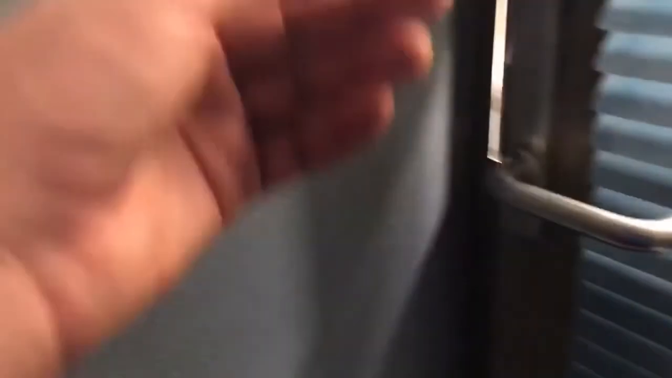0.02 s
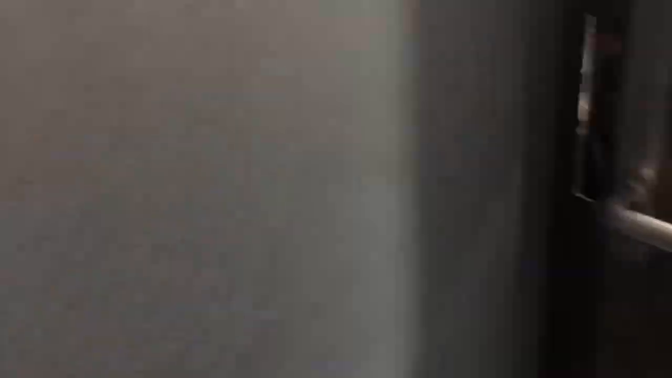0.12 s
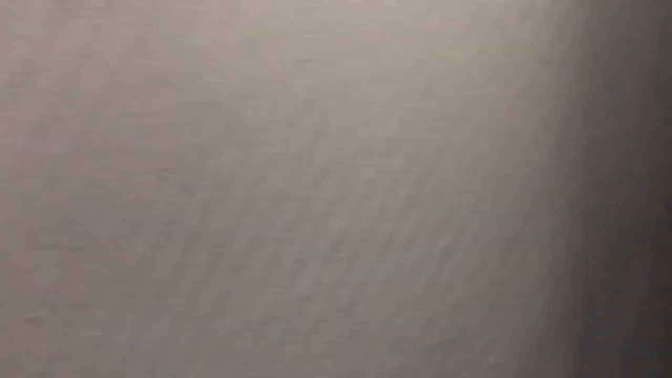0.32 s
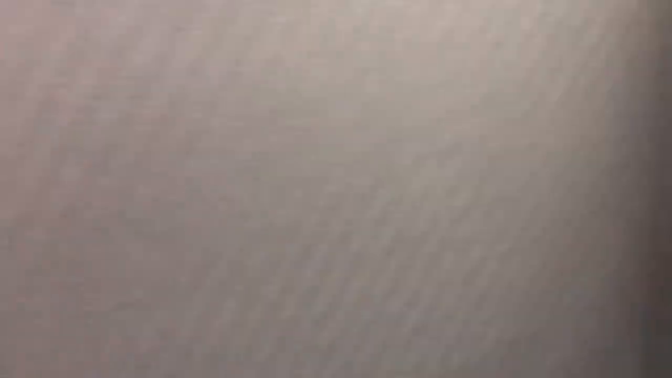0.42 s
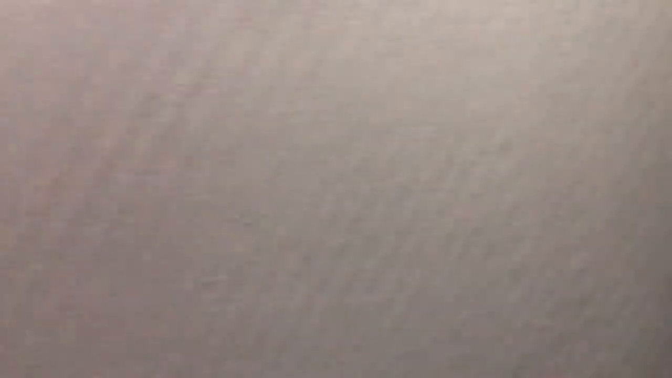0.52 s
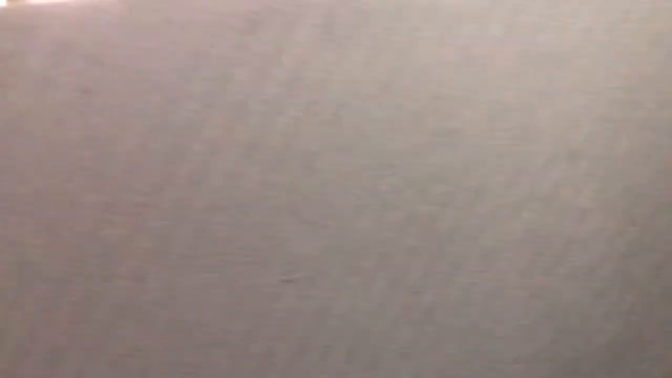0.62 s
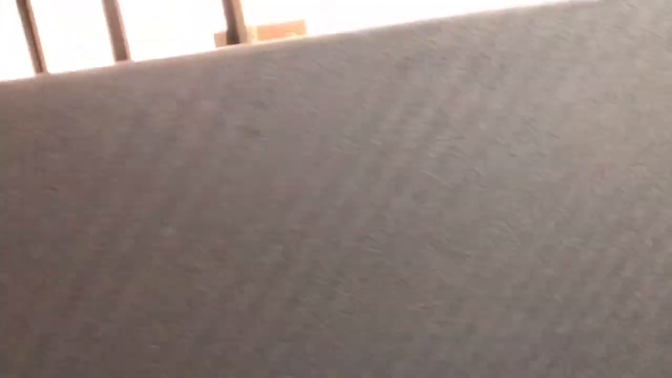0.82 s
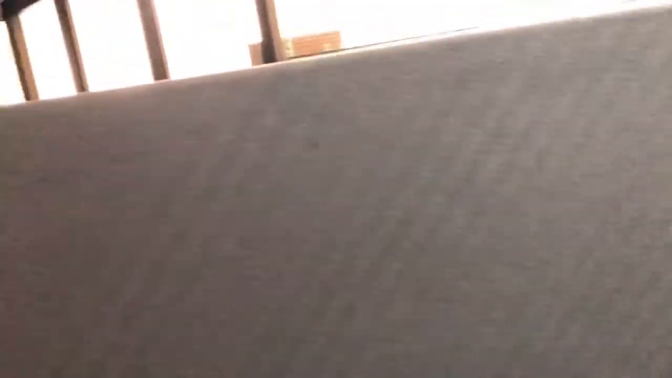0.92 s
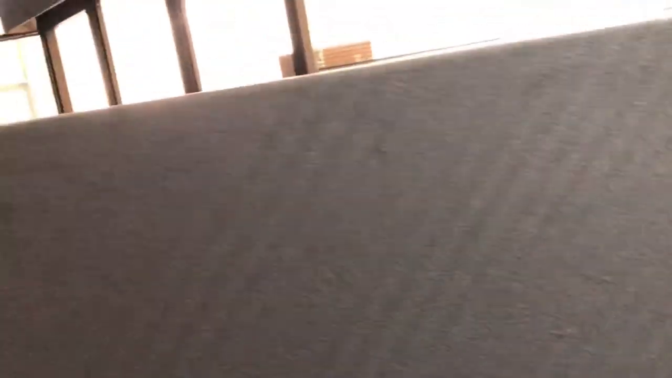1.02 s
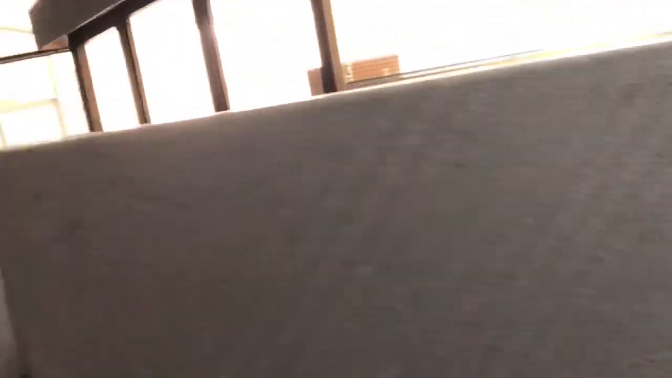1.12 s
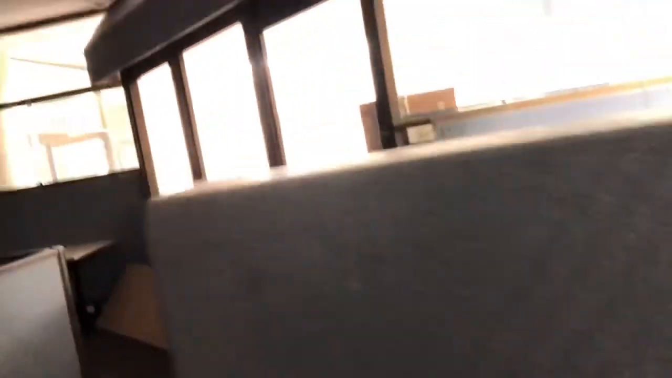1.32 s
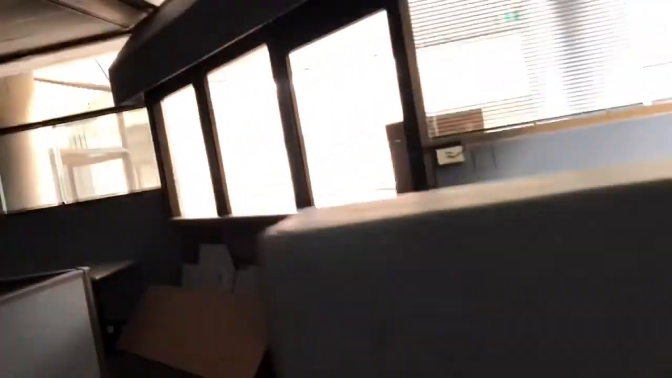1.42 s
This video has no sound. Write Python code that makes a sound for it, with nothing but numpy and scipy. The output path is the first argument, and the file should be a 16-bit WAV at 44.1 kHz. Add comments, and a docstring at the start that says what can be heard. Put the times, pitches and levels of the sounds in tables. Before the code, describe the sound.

Close up, a door handle's latch clicks, bangs loudly with a hollow panel knock, clacks again with a gritty scrape, then clicks softly with a tiny spring ring; faint rustle and late tick over quiet room rumble.

```python
"""In an empty office, close to a small microphone, a metal lever handle is worked on a panel door.
The latch clicks and chatters: short noise bursts plus ringing lever tones, with a high ping at the first clicks.
The door knocks and booms, then scuffs faintly: dull noise plus fading tones. After a faint high hiss the spindle
scrapes (gritty hiss), a spring sings briefly (short wavering tones), and a faint rustle follows.
The room rings on over low rumble, room noise, a faint hum and microphone hiss."""
import sys
import numpy as np
from scipy import signal
from scipy.fft import rfft, irfft, next_fast_len
from scipy.io import wavfile
from scipy.ndimage import map_coordinates

SR = 44100
rng = np.random.default_rng(int(sys.argv[2]) if len(sys.argv) > 2 else 0)


def store_pcm(level_fs):
    """Save levels as 16-bit WAV."""
    pcm = np.round(np.clip(level_fs, -1, 1) * 32767).astype(np.int16)
    wavfile.write(sys.argv[1], SR, np.atleast_2d(pcm).T)


N = 66150
T = np.arange(N) / SR  # time of every sample, in seconds


def amp(db):
    """Turn decibels into a multiplier."""
    return 10 ** (np.asarray(db) / 20)


def unit(x):
    """Scale a sound to an average (rms) strength of 1."""
    return x / np.sqrt(np.mean(x ** 2) + 1e-20)


def level(rows):
    """Loudness curve through (start_s, level_db) points, practically silent outside them."""
    return amp(np.interp(T, *np.transpose(rows), left=-150, right=-150))


def along(points, hz):
    """Read a curve of (pitch_hz, value) points, with pitch spaced as the ear hears it (log axis)."""
    point_hz, values = np.transpose(points)
    return np.interp(np.log(hz + 1), np.log(point_hz + 1), values)


def filtered(x, response):
    """Multiply every frequency in x by response(hz)."""
    size = next_fast_len(N + SR // 2)  # spare room so that the end does not wrap onto the start
    spectrum = rfft(x, size) * response(np.fft.rfftfreq(size, 1 / SR))
    return irfft(spectrum, size)[..., :N]


def noise(spectrum):
    """Random noise coloured by (pitch_hz, level_db) points, scaled to rms 1."""
    return unit(filtered(rng.standard_normal(N), lambda hz: amp(along(spectrum, hz))))


def wobble(rate):
    """A smooth random curve with rate random points a second."""
    points = rng.standard_normal(int(N * rate / SR) + 4)
    return map_coordinates(points, [T * rate])


def tone(phase):
    """A sine of rms 1."""
    return np.sqrt(2) * np.sin(phase)


def burst(start, rise, t60):
    """Loudness that rises from start, then fades by 60 dB every t60 seconds."""
    t = np.maximum(T - start, 0)
    return (1 - np.exp(-t / max(rise, 1e-4))) * amp(-60 * t / max(t60, 1e-3))


DETUNE = 0.015  # typical random pitch shift, as a fraction


def ring(modes, start, spread_db, rise):
    """Fading tones, each shifted slightly in pitch at random, and in level too when spread_db is above 0."""
    out = np.zeros(N)
    for hz, db, t60 in modes:
        gain = amp(db + spread_db * rng.standard_normal())
        shifted_hz = hz * (1 + DETUNE * rng.standard_normal())
        out += gain * burst(start, rise, t60) * np.sin(2 * np.pi * shifted_hz * (T - start))
    return out


# Loudness of the low rumble, before a small trim: start_s, level_db
RUMBLE_LEVEL = [(0.0, -45), (0.074, -43), (0.192, -49), (0.216, -31), (0.324, -31), (0.43, -42),
                (0.538, -32), (0.572, -54), (0.66, -42.5), (0.768, -51), (0.788, -49), (0.968, -57.5),
                (1.274, -60), (1.302, -65), (1.34, -61.5), (1.5, -58)]
# Tone colour of the rumble: pitch_hz, level_db (relative, per Hz)
RUMBLE_COLOUR = [(13, -39), (22, -13), (42, 1.5), (59, 6), (113, -5.5), (162, -3.5), (260, -23), (340, -47),
                 (570, -120)]


def rumble():
    """Door and floor rumble: deep noise that swells and sinks."""
    return level(RUMBLE_LEVEL) * amp(-1.5) * noise(RUMBLE_COLOUR)


# Loudness of the room noise, before its waver: start_s, level_db
AIR_LEVEL = [(0, -53), (.07, -53.5), (.11, -49.5), (.19, -48), (.35, -56), (.5, -49.5), (.7, -58),
             (.84, -61.5), (.95, -64), (1.1, -65), (1.5, -63)]
# Tone colour of the room noise: pitch_hz, level_db (relative, per Hz)
AIR_COLOUR = [(59, -37.5), (100, -12), (255, -13), (274, -15.5), (348, -14), (560, -14), (886, -22.5),
              (2220, -25.5), (2870, -27.5), (8000, -35.5), (10400, -67), (17600, -120)]
AIR_WAVER_DB = 1.2


def room_noise():
    """Soft coloured noise whose loudness wavers a little."""
    waver = amp(AIR_WAVER_DB * wobble(12.37))
    return level(AIR_LEVEL) * waver * noise(AIR_COLOUR)


# Steady tones of the mains hum, before their waver: pitch_hz, level_db (rms)
HUM_TONES = [(150, -69), (200, -87.5), (250, -70.5), (450, -76)]


def hum():
    """Mains hum: a few low sine tones, each slowly wavering in loudness."""
    out = np.zeros(N)
    for hz, db in HUM_TONES:
        gain = amp(db + 1.52 * wobble(2.7))
        out += gain * tone(2 * np.pi * (hz * T + rng.random()))
    return out


# Tone colour of the microphone's own hiss: pitch_hz, level_db (relative, per Hz)
HISS_COLOUR = [(2350, -26), (4000, -0.5), (7230, -6), (10700, -3.5), (16000, -11.5)]


def microphone_hiss():
    """Steady faint noise made by the microphone."""
    return amp(-74) * noise(HISS_COLOUR)


def background():
    """Everything that lies under the handle: rumble, room noise, hum and hiss add up."""
    return rumble() + room_noise() + hum() + microphone_hiss()


# How long the room's echo takes to fall by 60 dB: pitch_hz, fade_s
ROOM_FADE = [(100, 1.2), (500, 0.95), (2000, 0.89), (6000, 0.53), (14000, 0.18)]
ROOM_DB, EARLY_DB = -13.5, -15  # strength of the long tail and of the quick answer
EARLY_T60 = 0.13  # seconds for the quick answer to fall by 60 dB


def room(x):
    """Near walls answer with quickly fading noise; a longer tail fades at its own speed at each pitch."""
    hz, t, grid = signal.stft(rng.standard_normal(SR), SR, nperseg=256)
    fade = amp(-60 * t / along(ROOM_FADE, hz)[:, None])
    tail = signal.istft(grid * fade, SR, nperseg=256)[1]
    early_fade = amp(-60 * np.arange(len(tail)) / SR / EARLY_T60)
    early = rng.standard_normal(len(tail)) * early_fade
    answer = amp(ROOM_DB) * tail / np.linalg.norm(tail) + amp(EARLY_DB) * early / np.linalg.norm(early)
    delayed = np.pad(answer, (200, 0))  # the answer comes 200 samples later, about 4.5 ms
    return signal.fftconvolve(x, delayed)[:N]


def gritty(spectrum):
    """Gritty noise: coloured noise roughened by fast random loudness changes, scaled to rms 1."""
    grit_db = 3.5
    return unit(noise(spectrum) * amp(grit_db * wobble(300)))


# Loudness of the faint rustle: start_s, level_db
RUSTLE_LEVEL = [(1.02, -74.5), (1.12, -68), (1.24, -71.5), (1.27, -67), (1.295, -67.5), (1.33, -69),
                (1.37, -61.5), (1.42, -70), (1.5, -68.5)]
# Tone colour of the rustle: pitch_hz, level_db (relative, per Hz)
RUSTLE_COLOUR = [(300, -33), (600, 0), (1300, 2.5), (2500, -9), (4000, -2.5), (6500, -12), (10000, -15)]


def rustle():
    """A faint gritty noise late in the scene."""
    return level(RUSTLE_LEVEL) * gritty(RUSTLE_COLOUR)


# Short ringing tones: a high ping with the first clicks, then spring notes; level before the waver:
# start_s, length_s, pitch_hz, level_db
SHORT_TONES = [(.085, .012, 12200, -44), (.165, .025, 3450, -62), (.34, .025, 4270, -47),
               (.522, .045, 1510, -52), (.57, .05, 3880, -67), (.63, .016, 1525, -59),
               (.642, .009, 4000, -55), (.643, .016, 6050, -62), (.648, .055, 3540, -59),
               (.662, .022, 1535, -54), (.686, .014, 1530, -62), (.72, .13, 1520, -71),
               (1.358, .014, 3900, -68), (1.38, .03, 3900, -72)]
SING_WAVER_DB = 2


def ping_and_spring():
    """A high ping, then a singing spring: short tones that swell, fade and waver in loudness and phase."""
    out = np.zeros(N)
    for start, length, hz, db in SHORT_TONES:
        progress = np.clip((T - start) / length, 0, 1)
        swell = np.sqrt(np.abs(np.sin(np.pi * progress))) * (T < start + length)
        gain = amp(db + SING_WAVER_DB * wobble(82.1))
        out += gain * swell * tone(2 * np.pi * hz * T + 0.2 * wobble(61.8))
    return out


# A faint high hiss at the start, then scraping strokes:
# loudness curve (points of start_s, level_db), pitch_factor for the colour
HISS_AND_STROKES = [([(0, -70.5), (.08, -67), (.11, -60.5), (.15, -64), (.19, -67.5), (.22, -82.5)], 0.87),
                    ([(.334, -65), (.343, -34), (.375, -38), (.41, -40.5), (.435, -54.5), (.465, -53.5),
                    (.48, -80)], 0.94), ([(.515, -73), (.524, -55.5), (.538, -50), (.56, -72), (.575, -87)],
                    0.85), ([(.625, -87), (.632, -67), (.643, -62), (.655, -48), (.7, -65.5), (.76, -87.5),
                    (.8, -86.5)], 0.85), ([(1.34, -90), (1.365, -79), (1.39, -79), (1.42, -90)], 1.0)]
# Tone colour of both before the pitch factor: pitch_hz, level_db (relative, per Hz)
SCRAPE_COLOUR = [(1180, -39), (2000, -12), (2880, -20.5), (3430, 2), (4150, -2), (4490, -3), (7380, -3),
                 (8700, -7.5), (12800, 5.5), (16000, -6.5)]


def hiss_and_scrape():
    """A faint high hiss, then the spindle slides: gritty noise with its colour moved for each row."""
    out = np.zeros(N)
    for rows, pitch_factor in HISS_AND_STROKES:
        colour = [(hz * pitch_factor, db) for hz, db in SCRAPE_COLOUR]
        out += level(rows) * gritty(colour)
    return out


# Knocks on the door, then a few faint low scuffs; level before a trim:
# start_s, level_db, boom_db (relative to the row's level)
KNOCKS_AND_SCUFFS = [(0.057, -43, 9), (.088, -36, -5), (.094, -29.5, -11), (.198, -16.5, -6),
                     (0.2081, -11, -8.5), (.212, -9, 3), (.217, -12, 4.5), (0.223, -15, 3),
                     (.239, -27.5, -1.5), (.258, -25.5, -17), (.271, -18.5, 8.5), (.323, -24, -3),
                     (.328, -20, 0), (.333, -17, -9), (.344, -28, 16.5), (.474, -28.5, -13),
                     (.48, -26.5, -15), (.487, -30.5, -1), (.498, -33.5, -5), (.52, -34.5, -14),
                     (.84, -47, -13.5), (1.129, -55, 20), (1.269, -59, -8)]
# Ringing tones of the panel: pitch_hz, level_db (relative), fade_s (time to fall by 60 dB)
PANEL_TONES = [(239.5, -7, .07), (321, -9, 0.099), (422.4, -5.5, 0.077), (444.5, 1.5, 0.048),
               (557.4, 0.5, 0.046), (631.4, -4, 0.026), (741, -10.5, 0.028), (871, -6, 0.026),
               (1045, -16, 0.064), (1243, -15, .06)]
# Slow deep tones of the door: pitch_hz, level_db (relative), fade_s (time to fall by 60 dB)
BOOM_TONES = [(38, -13, .3), (59.4, -16, 0.13), (103.5, -19, 0.28), (171, -3, 0.075)]
# Tone colour of the dull noise: pitch_hz, level_db (relative, per Hz)
THUD_COLOUR = [(150, -41.5), (300, -1), (600, -5.5), (1200, -12.5), (2500, -37)]
THUD_DB, THUD_T60 = -6.5, 0.15  # thud level against the row's level, and seconds to fall by 60 dB
BOOM_RISE_S = 0.0053


def knocks_and_scuffs():
    """Knocks, then faint low scuffs: each adds a dull thud, ringing panel tones and slow deep tones."""
    out = np.zeros(N)
    for start, db, boom_db in KNOCKS_AND_SCUFFS:
        panel = ring(PANEL_TONES, start, spread_db=3.5, rise=0.00056)
        thud = amp(THUD_DB) * noise(THUD_COLOUR) * burst(start, 0.00055, THUD_T60)
        boom = amp(boom_db) * ring(BOOM_TONES, start, spread_db=6, rise=BOOM_RISE_S)
        out += amp(db - 10.5) * (panel + thud + boom)
    return out


# Metal contacts, level before a trim: start_s, level_db, low_mid_lift_db, treble_lift_db,
# chatter_fade_s (time to fall by 60 dB)
LATCH_CLICKS = [(0.0828, -33.5, 3, 0, 0.12), (0.0859, -22, -6, 16, 0.039), (0.0876, -15, -9.5, -23, 0.045),
                (0.093, -31, -1, -20, .04), (0.194, -18.5, 1, 5, 0.045), (0.199, -23, 6.5, 2, 0.032),
                (0.2061, -8.5, -25, 5, 0.054), (.2095, -5.5, 7, 10, 0.028), (0.2175, -19, 2.5, 1.5, 0.023),
                (0.2269, -8, -10, -2.5, .03), (0.2302, -20.5, -2, -12, 0.05), (0.243, -33.5, 3, -4, 0.021),
                (0.2614, -23.5, 15.5, 19.5, .04), (0.2641, -19.5, -11, 15.5, .04),
                (0.2702, -27, 11, 1, .04), (0.3206, -10.5, -2, -1, 0.031), (0.3239, -12.5, 6, 6, 0.043),
                (.3304, -29, 21, -12, 0.027), (0.4718, -20.5, 0.5, 1.5, 0.047),
                (0.4799, -27.5, 10, 5.5, 0.034), (.4864, -42, 10, -15.5, 0.023), (0.535, -54, -6, 9, .05),
                (0.6443, -32, -20, 7.5, 0.036), (0.65, -38, -1, 12.5, 0.063), (0.657, -31, -1, -4, 0.044),
                (0.965, -62, -9, 13.5, .02), (1.186, -54, -7, 13, 0.031), (1.269, -61, 17.5, -12, 0.15),
                (1.3002, -37, -5, -8, 0.028), (1.3588, -54, -6, 2, .06)]
# Tone colour of the metal chatter: pitch_hz, level_db (relative, per Hz)
CHATTER_COLOUR = [(410, -18), (700, -5), (997, -17), (1890, -9.5), (2220, -12), (3550, -9.5), (4210, -12),
                  (5330, -13.5), (7690, -16.5), (16000, -33)]
# Ringing tones of the lever: pitch_hz, level_db (relative), fade_s (time to fall by 60 dB)
LEVER_TONES = [(1740, -18, 0.075), (1940, -12.5, 0.067), (3565, -28, 0.038), (3780, -23.5, 0.056),
               (4780, -23.5, 0.028), (5274, -17, 0.062), (5760, -15.5, 0.04), (6100, -17.5, 0.064),
               (6740, -20, 0.036)]
LOW_MID_HZ, TREBLE_HZ = 2380, 8000  # lifts act below the first and above the second


def latch():
    """Each metal contact is a short noisy chatter that also rings the lever."""
    out = np.zeros(N)
    for start, db, low_db, treble_db, t60 in LATCH_CLICKS:
        chatter = noise(CHATTER_COLOUR) * amp(1.5 * wobble(900)) * burst(start, 0.00025, t60)
        lever = ring(LEVER_TONES, start, spread_db=0, rise=0.00018)

        def colour(hz):
            """Smooth tone controls for this contact."""
            treble = treble_db / (1 + (TREBLE_HZ / (hz + 1)) ** 4)
            low_mid = low_db / (1 + (hz / LOW_MID_HZ) ** 4)
            return amp(treble + low_mid)

        out += amp(db - 10) * filtered(chatter + lever, colour)
    return out


def scene():
    """The handle and door sounds excite the room; ping, spring and background are added directly."""
    near = latch() + knocks_and_scuffs() + hiss_and_scrape() + rustle()
    return (near + room(near) + ping_and_spring() + background())[None]


MIC_LOW_HZ, TOP_HZ = 32, 15750  # where the bass fades away, and the upper limit


def record(dry):
    """The microphone loses the deepest bass; nothing passes from the upper limit up."""
    def response(hz):
        """Two bass cuts in a row, and a sharp top limit."""
        bass_cut = (1j * hz / (MIC_LOW_HZ + 1j * hz)) ** 2
        return bass_cut * (hz < TOP_HZ)

    return filtered(dry, response)


dry = scene()
out = record(dry)
store_pcm(out)
```